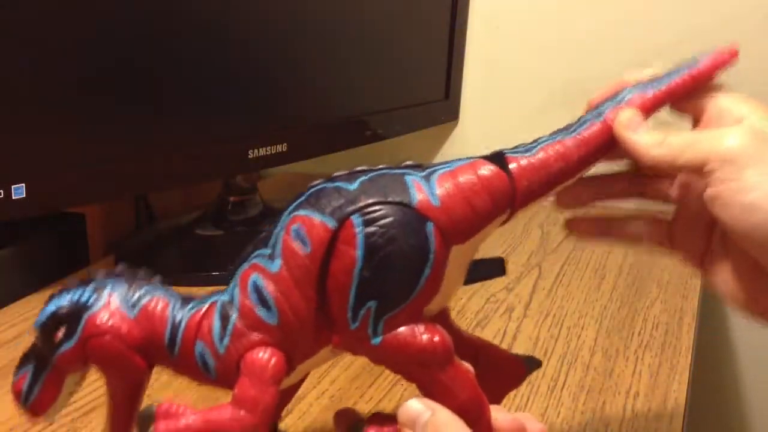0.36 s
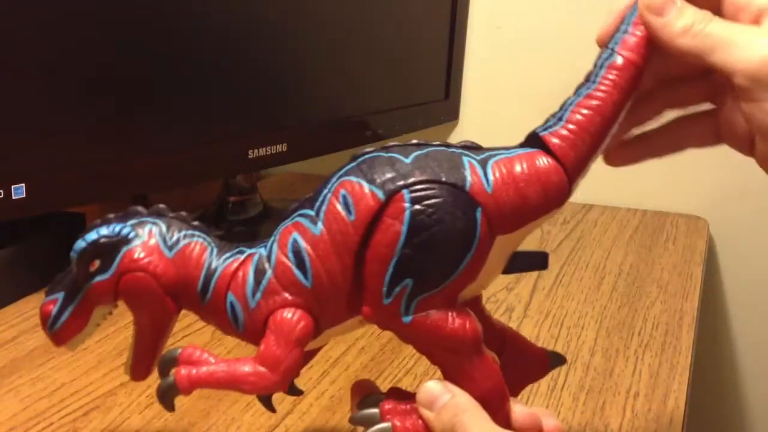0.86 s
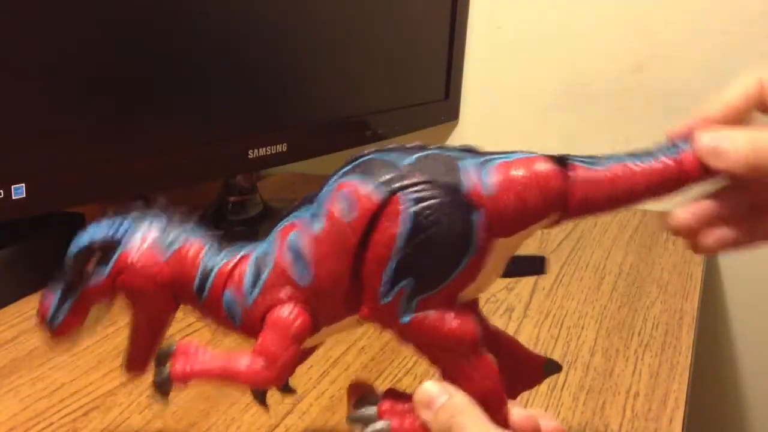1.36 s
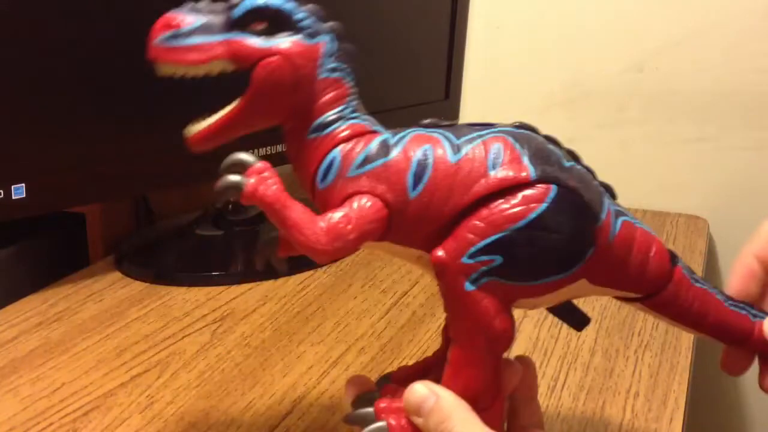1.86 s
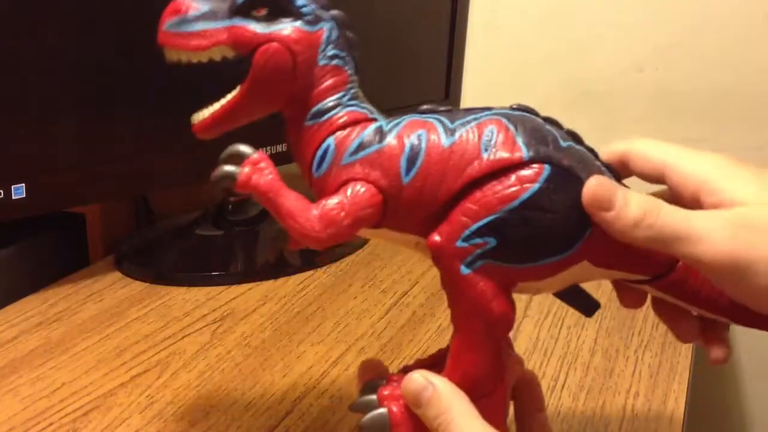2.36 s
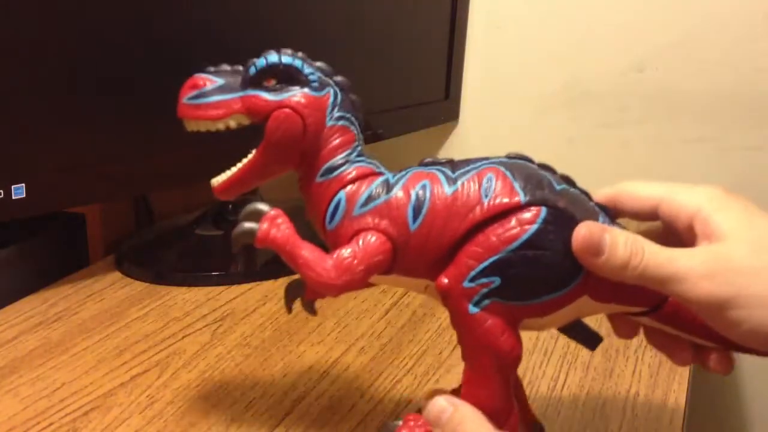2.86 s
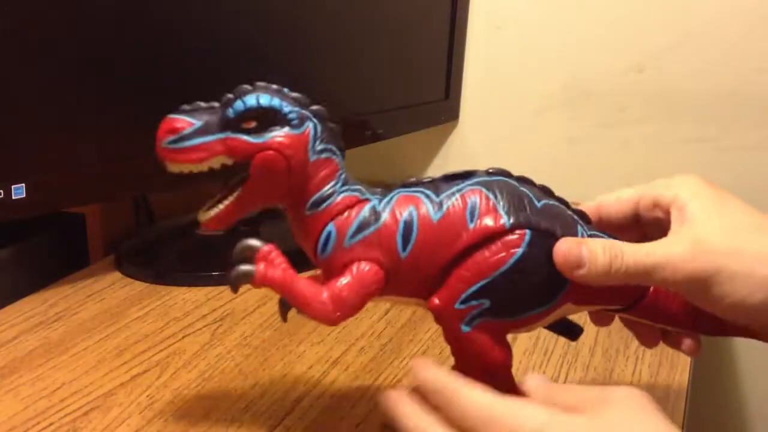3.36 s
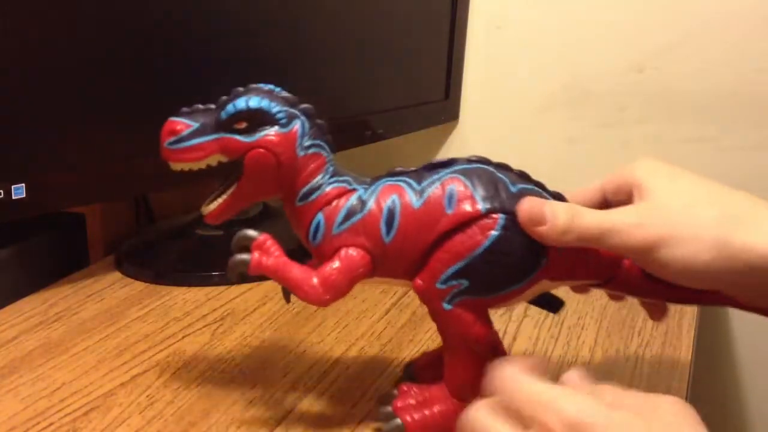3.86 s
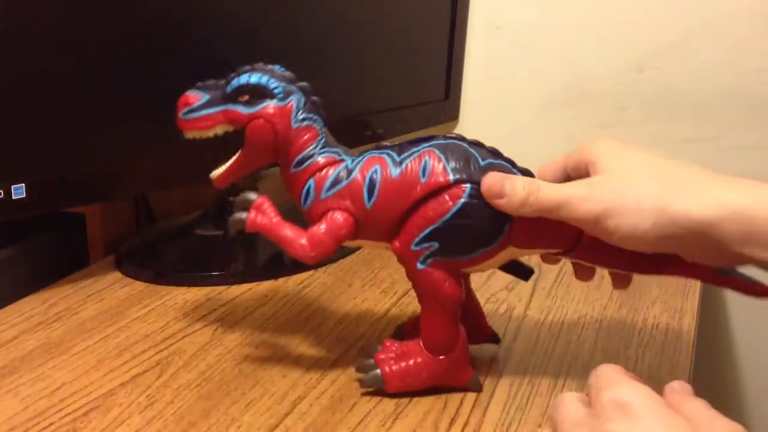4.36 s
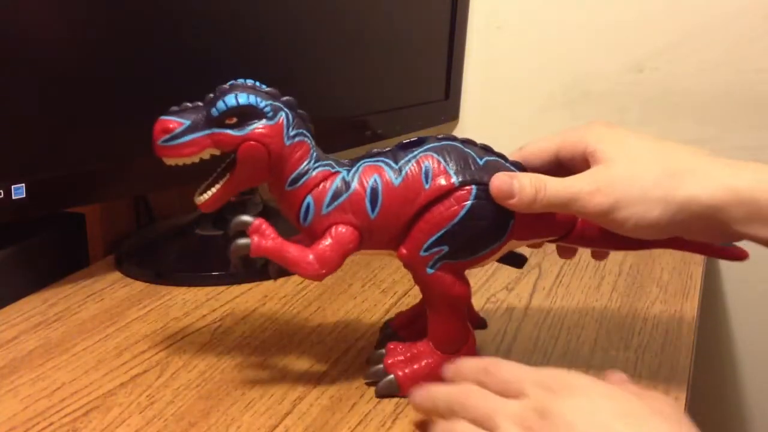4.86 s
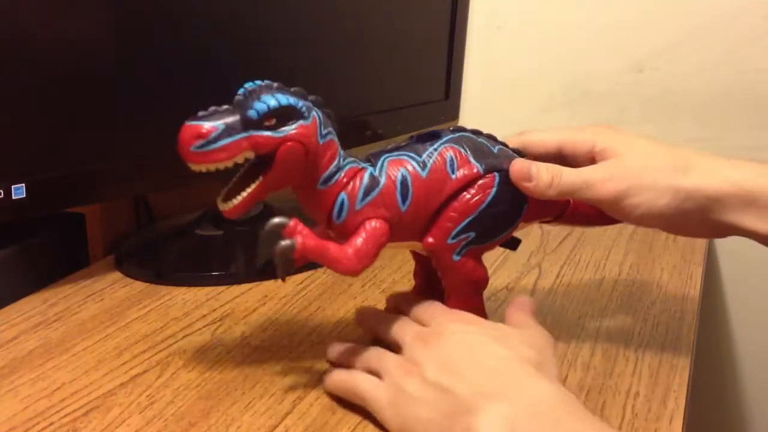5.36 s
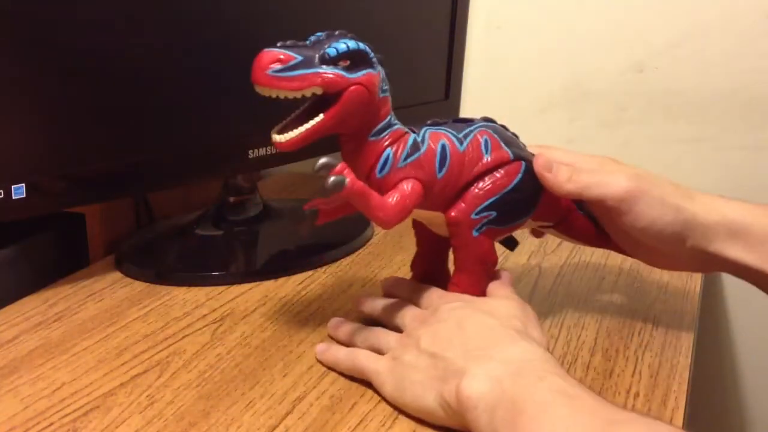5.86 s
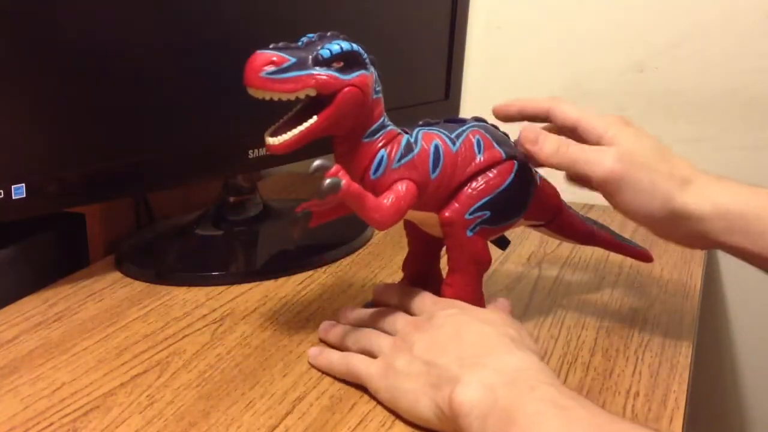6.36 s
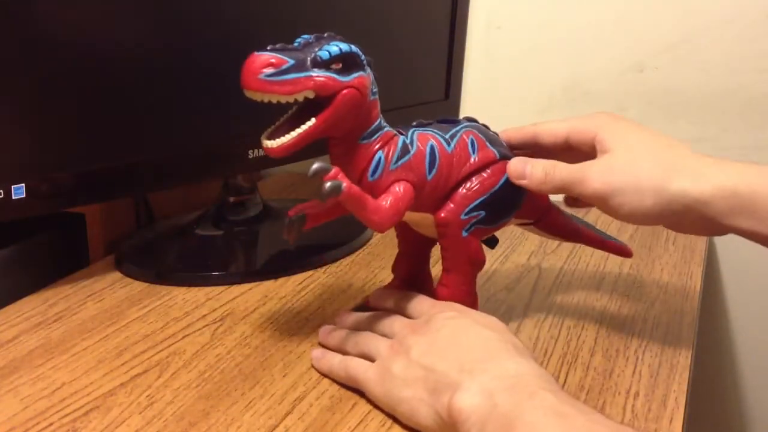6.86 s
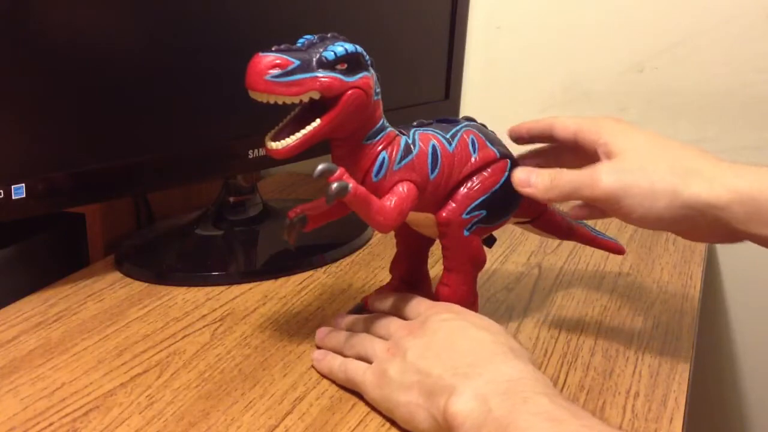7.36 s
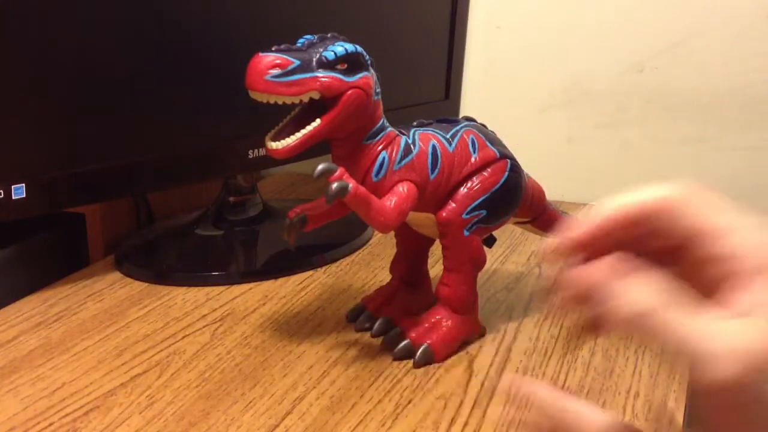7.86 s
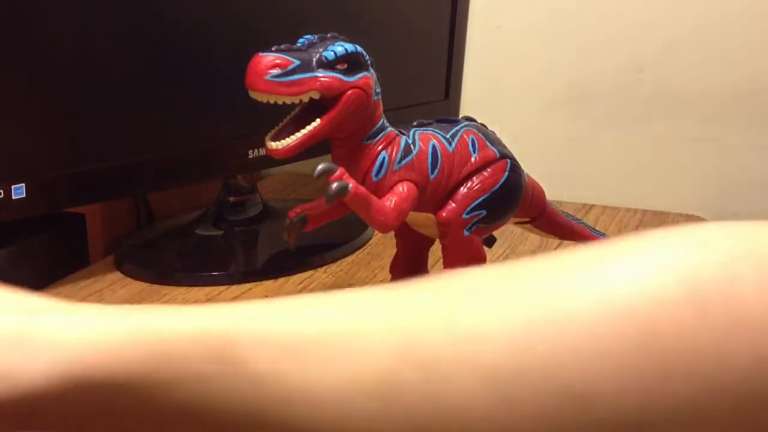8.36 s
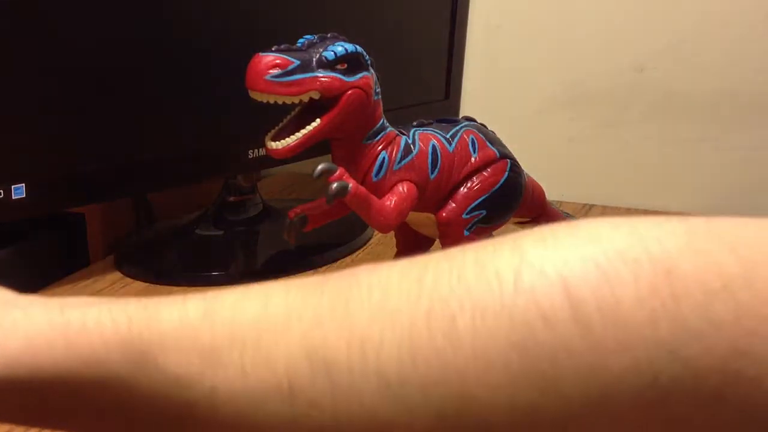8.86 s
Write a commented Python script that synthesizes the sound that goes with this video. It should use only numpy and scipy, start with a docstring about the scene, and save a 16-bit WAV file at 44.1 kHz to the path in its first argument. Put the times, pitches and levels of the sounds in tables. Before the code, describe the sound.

Sharp plastic clicks from a jointed hollow toy, then knocks, scrapes and hand rubbing on a wooden desk, close up in a quiet room.

```python
"""Clicks and a soft knock come first, over faint hiss: a hollow hard plastic toy is posed and slid about
on a wooden desk, close to a small microphone in a small quiet room. Noise bursts through resonances make
the clicks of its ratchet joints and feet and the knocks on the desk; swelling noise makes the brushing of
hands, the rubbing and the desk's hum. Gritty skids, one gliding squeak and a whispered rustle come later."""
import sys
import numpy as np
from scipy import signal
from scipy.fft import rfft, irfft, next_fast_len
from scipy.io import wavfile
from scipy.ndimage import uniform_filter1d

SR = 44100
rng = np.random.default_rng(int(sys.argv[2]) if len(sys.argv) > 2 else 0)


def generate_wav(sig):
    """Save sig (samples, or channels by samples) to the path in sys.argv[1] as 16-bit PCM at SR."""
    pcm = np.round(np.clip(np.atleast_2d(sig).T, -1, 1) * 32767).astype(np.int16)
    wavfile.write(sys.argv[1], SR, pcm)


def volts_from_db(level):
    """Convert decibel levels to linear amplitude ratios."""
    exponent = np.asarray(level, float) / 20
    return 10 ** exponent


N = 407484  # length in samples

# Place: steady room tone and hiss: f/Hz, relative density/dB per Hz
AIR_SPECTRUM = [(18, -48), (30, -20), (48, 5.5), (113, 3), (207, 3), (1190, -6), (1500, -6), (2400, -9),
                (4610, -8.5), (9820, -14.5), (14100, -12.5), (15300, -12)]
AIR_RMS_DB = -68.5
# Place: decay of the small room: f/Hz, t60/s
ROOM_DECAY = [(250, 0.41), (700, 0.2), (2000, 0.23), (5000, 0.21), (12000, 0.22)]

# Desk: feet and palms land: t/s, direct peak level ahead of the port/dB, contact/ms, rattle t60/s,
# share of the low modes/dB
KNOCKS = [(0.004, -43, 0.32, 0.09, 4), (1.32, -55.5, 0.96, 0.037, 4.5), (3.032, -37, 0.74, 0.086, -2),
          (3.336, -38, 0.9, 0.1, 1), (3.4, -41, 0.6, 0.091, 5), (4.084, -45, 0.76, 0.38, -14),
          (4.139, -46.5, 0.94, 0.48, -6), (4.276, -49, 0.54, 0.46, -2), (4.491, -37.5, 0.27, 0.21, 5),
          (4.801, -42, 0.65, 0.11, 2), (5.046, -41.5, 0.51, 0.24, -7), (5.299, -43.5, 0.78, 0.26, -4),
          (5.343, -18, 0.41, 0.14, -7.5), (5.57, -44.5, 0.49, 0.067, 4), (5.597, -32.5, 0.84, 0.087, 1.5),
          (5.755, -42.5, 0.38, 0.17, -7), (5.867, -53, 0.75, 0.38, -4), (5.91, -44.5, 0.85, 0.25, -1.5),
          (5.99, -51, 0.77, 0.19, -6), (6.082, -52, 1, 0.17, 6), (6.216, -50, 0.72, 0.21, 4),
          (6.677, -39, 1, 0.14, -3.5), (7.807, -58, 0.7, 0.12, -3), (7.848, -51, 0.7, 0.16, -3),
          (8.354, -36.5, 1, 0.25, -16)]
# Desk: modes of the wooden top: f/Hz, width/Hz, level/dB
DESK_MODES = [(129, 26, -8.5), (188.5, 27, -3.5), (248, 26, 1.5), (352.6, 67, 2.5), (531, 59, -1),
              (668, 65, -14.5), (965, 84, 0.5), (1208, 70, 0), (1378, 150, -2.5), (1714, 67, -3.5),
              (2143, 240, -4), (2700, 400, -9.5)]
# Desk: the top humming under the palm: f/Hz, width/Hz, level/dB
HUM_MODES = [(120, 27, -15.5), (193, 27.4, 0), (264, 45, -10), (352, 76.3, -12.5), (490, 153, -16)]
# Beside the microphone: the reaching arm bumps a thing; columns as in KNOCKS
BUMPS = [(8.656, -48, 0.22, 0.19, -1), (8.697, -42, 0.58, 0.2, -1), (8.713, -22.5, 0.51, 0.13, -7),
         (8.771, -42, 0.51, 0.17, -3), (8.843, -31, 0.99, 0.22, -8.5)]
# Beside the microphone: modes of that thing: f/Hz, width/Hz, level/dB (its rub passes them twice)
NEAR_MODES = [(248, 18, 4.5), (382, 38, 2), (604, 135, 3), (930, 190, 1), (1390, 350, 0), (1800, 380, -5.5),
              (2290, 170, 2), (2760, 370, -2.5), (3180, 220, -3), (4950, 840, -5), (5670, 760, -1.5)]
RATTLE_RISE_MS = 1.6

# Toy: joints slip, nails and claws tick: t/s, direct peak level ahead of the port/dB, brightest f/Hz,
# gain of the hollow body/dB, gain of the thin rims/dB
CLICKS = [(0.0044, -29.5, 2700, -22, -27), (0.129, -30.5, 6300, -30.5, -14), (0.2873, -43, 3520, -22, -29),
          (0.2932, -39.5, 3520, -23, -22), (0.2976, -35.5, 3820, -23.5, -28),
          (0.3057, -41.5, 4540, -18, -21), (0.4113, -39, 4540, -28, -21), (0.708, -50.5, 2260, -10, -32),
          (0.7332, -53, 2120, -9, -33), (0.739, -38, 2760, -18, -30), (0.8388, -29.5, 2530, -22, -20),
          (1.0184, -24, 2560, -24, -22), (1.071, -31.5, 2810, -23, -19), (1.0799, -15.5, 8000, -33, -5.5),
          (1.3213, -36.5, 2240, -12, -22), (1.3416, -38.5, 3220, -36, -22), (1.4402, -40, 5000, -25, -17),
          (1.48, -48, 2420, -25, -23), (1.4971, -30.5, 4530, -25.5, -18), (1.8724, -29, 4200, -23, -23),
          (1.9034, -29, 4500, -25, -19), (2.325, -40.5, 3340, -18.5, -23), (2.3694, -31.5, 4800, -28, -20),
          (2.3932, -28.5, 4260, -24.5, -25), (2.5687, -28.5, 5140, -27.5, -10.5),
          (2.6512, -51, 2620, -21, -31), (2.7267, -24, 4260, -34, -17), (2.778, -41, 6110, -19, -7),
          (2.797, -27, 3800, -26, -21), (3.0397, -37.5, 4300, -13.5, -20), (3.1185, -41, 6740, -22, -21),
          (3.1243, -33.5, 3600, -21, -20), (3.1284, -20, 5200, -31, -12), (3.1699, -34.5, 4620, -14, -9),
          (3.246, -31.5, 4500, -27, -32), (3.3383, -34.5, 4400, -12, -23), (3.4004, -28.5, 7200, -21, -14),
          (3.4184, -23.5, 4650, -26, -15), (3.5912, -24, 4600, -29, -17.5),
          (3.6531, -25.5, 4560, -24.5, -21), (3.7544, -30, 4330, -27, -25), (4.0934, -37.5, 6700, -24, -18),
          (4.2731, -19.5, 4540, -22.5, -13), (4.4888, -29, 7040, -18, -10),
          (4.4975, -24.5, 1500, -19.5, -34), (4.8045, -33.5, 6950, -23, -16),
          (5.3022, -32.5, 4900, -27, -15), (5.3403, -13.5, 4650, -12, -12), (5.46, -29, 3800, -20, -21),
          (5.463, -25.5, 4030, -22, -17), (5.5704, -36.5, 4700, -10.5, -15), (5.601, -35.5, 1560, -42, -20),
          (5.7182, -40, 4160, -27, -33), (5.7537, -40.5, 3980, -10, -24), (5.8663, -44.5, 1600, -16, -25),
          (5.909, -28, 4650, -20.5, -14.5), (5.99, -46, 4330, -6, -22), (6.235, -44, 1990, -10.5, -22),
          (6.445, -54, 1680, -19, -26), (6.4918, -43.5, 6600, -32, -19), (6.5388, -46.5, 6460, -26, -17),
          (6.664, -38, 4550, -17, -22), (6.7306, -53, 4240, -12, -20), (6.797, -44, 7100, -21, -31),
          (7.1763, -54, 1740, -11, -23), (7.3146, -52.5, 1650, -14, -8), (8.713, -35.5, 1500, -1, -9),
          (8.8412, -37, 1510, -18, -20), (8.937, -46, 2210, -29, -19)]
# Toy: resonances of the plastic shell: f/Hz, width/Hz, level/dB
SHELL_MODES = [(2000, 545, 4), (2480, 250, 4), (2930, 190, -0.5), (3600, 634, 0), (4004, 1250, -13.5),
               (4930, 1000, -5.5), (6147, 2520, 0.5), (6916, 2130, 0), (8980, 1400, -10.5),
               (10700, 410, -28)]
# Toy: air inside, passed twice: f/Hz, width/Hz, level each pass/dB
HOLLOW_MODES = [(917, 720, 9.5), (1500, 264, 9.1)]
# Toy: thin rims, passed twice: f/Hz, width/Hz, level each pass/dB
RIM_MODES = [(9950, 12000, 4.65)]
# How narrowly the struck spot favours its brightest pitch: f/width
SHARPNESS = 2.5
# All slips share one time scale; hollow clicks fill the room more, bright ones less
SLIP_MS, USUAL_HZ, USUAL_BODY_DB = 2.73, 4000, -22
CLICK_ROOM_DB, ROOM_DB_PER_OCTAVE, ROOM_DB_PER_BODY_DB = -1.5, -1.5, 0.0864

# Strokes, one a row: start t/s, rise/ms, fall/ms, rub level/dB, weight = hum over rub/dB
# The toy's feet drag on the wood
DRAGS = [(2.8, 293, 110, -62, -3), (3.1, 154, 100, -65, -3), (3.28, 117, 220, -64, 6),
         (3.59, 18, 130, -68.5, 5.5), (3.62, 170, 740, -65.5, 1), (3.95, 160, 240, -66.5, 1),
         (4.3, 116, 100, -73.5, 1), (4.5, 253, 98, -70, 0.5), (5.33, 28, 220, -66, -5),
         (5.44, 120, 170, -61.5, -3), (5.6, 66, 160, -62.5, -2), (5.74, 39, 52, -62.5, 2),
         (5.85, 175, 87, -68.5, 4.5), (6.07, 22, 49, -72, 8), (6.1, 430, 500, -77, 8),
         (6.89, 20, 33, -76, 2), (7.02, 25, 37, -74, 1), (7.05, 55, 340, -76.5, 7)]
# A flat hand or forearm sweeps over the desk; same columns
SWEEPS = [(4.79, 68, 170, -61.5, 12), (4.88, 94, 50, -63, 12), (4.98, 60, 90, -56.5, -1),
          (5.05, 100, 95, -64, -7), (5.14, 29, 45, -57, -2.5), (5.2, 32, 99, -55, -3.5),
          (5.26, 27, 45, -63, 1), (7.52, 152, 135, -63, -10), (7.7, 92, 50, -66, 4),
          (7.79, 26, 35.2, -56, 8), (7.83, 24, 45, -55, 10.5), (7.86, 44, 114.3, -57, -3),
          (7.97, 46, 95, -63.5, -5.5), (8.17, 65, 70, -64, -11), (8.26, 40, 60, -61, -16),
          (8.345, 9.7, 60, -65, 20.5), (8.31, 68, 111, -49.5, -13), (8.4, 62, 70.4, -64, -1),
          (8.46, 61, 120, -62.5, 0.5)]
# A cupped palm slides on the desk; same columns
WIPES = [(7.42, 6.2, 25, -55, -9.5), (7.42, 61, 101, -57, -4), (8.135, 41, 110, -57.5, -9.5),
         (8.2, 89, 40, -56, -10), (8.28, 60, 40, -51, -22)]
# The arm rubs along the thing beside the microphone; same columns
REACHES = [(8.58, 88, 40, -62, -3), (8.67, 30, 25, -56, 3), (8.7, 17, 80, -43.5, -4),
           (8.73, 45, 90, -54, -8), (8.8, 37, 75, -51.5, 3.5), (8.87, 75, 100, -64.5, 0),
           (9.11, 30, 40.2, -55.5, -2), (9.14, 86, 90, -42, -9)]
# Manner of each kind of stroke: dry brushing level at the usual rub/dB, its growth/dB per rub dB,
# its loss/dB per weight dB, swell exponent (higher is more pointed)
DRAG_MANNER = (-70, 0, 2.7, 1.23)
# Manner of the sweeps; same columns
SWEEP_MANNER = (-61, 1.09, 0.62, 1.18)
# Manner of the wipes; same columns
WIPE_MANNER = (-67.5, 1.54, 0.11, 1.36)
# Manner of the reaches; same columns
REACH_MANNER = (-65.5, 0.41, 0.69, 1.72)
USUAL_RUB_DB = -60
# Dry brushing of skin: f/Hz, relative density/dB per Hz
BRUSH_SPECTRUM = [(300, -21), (1000, -0.5), (3000, -10), (7000, 2), (10000, -2.5), (13000, -2),
                  (15000, -10)]
# Rub of the toy's feet, passed twice: f/Hz, width/Hz, level each pass/dB
FEET_MODES = [(700, 390, 4), (963, 160, 6), (1226, 130, 3.5), (1700, 720, 1), (2460, 2200, -4),
              (3960, 2400, -4.5)]
# Loose contact of flat skin, passed twice: f/Hz, width/Hz, level each pass/dB
FLAT_MODES = [(420, 350, 5), (1036, 510, 2.5), (1710, 660, 2.5), (2960, 1440, 0.5), (4420, 750, -1.5)]
# Hollow under the hand, passed twice: f/Hz, width/Hz, level each pass/dB
GRIP_MODES = [(915, 260, -3.5), (1260, 270, -1.5), (1615, 310, 1), (2530, 570, -5), (3147, 260, 1.5),
              (3810, 400, -3.5), (4240, 230, -2.5)]

# A palm grips, lets go and skids: t/s, direct peak of the rub ahead of the port/dB,
# fall to 1/e/ms, hiss level re that peak/dB
SKIDS = [(4.8165, -45.5, 19, -6), (4.8473, -42, 28, -8), (4.9286, -51, 28, 1.5), (5.1091, -39.5, 24, -11),
         (5.1536, -40, 19, -13), (5.2244, -39.5, 14, -15), (6.0172, -53.5, 35, -8.5),
         (7.4229, -44.5, 46, -10), (7.4599, -49.5, 45, -4.5), (7.8045, -53, 65, -8.5),
         (8.1445, -51.5, 62, -27), (8.2016, -45, 14, -16), (8.2261, -47.5, 31, -9.5)]
# Skin squeaks once: t/s, f/Hz, level/dB
SQUEAK = [(5.0, 2000, -77), (5.02, 2270, -73), (5.037, 2490, -56), (5.05, 2140, -62), (5.065, 1900, -80)]
# A fingertip whispers over the ridges: t/s, level/dB
RUSTLE = [(6.5, -94), (6.56, -78), (6.63, -76), (6.68, -93)]

# Microphone port, a peak then a notch: f/Hz, width/Hz
PORT = [(4780, 450), (5060, 280)]
# Overall band limits, weak lows and a steep fall near 15.4 kHz: f/Hz, level/dB
BAND_LIMITS = [(40, -22), (70, -19), (110, -1.5), (15250, 0), (15500, -62)]


def evened(x):
    """Scales to rms 1."""
    return x / np.sqrt(np.mean(x ** 2) + 1e-20)


def read(points, hz):
    """Reads a spectrum on a log-frequency axis."""
    f, value = np.transpose(points)
    return np.interp(np.log(hz + 1), np.log(f + 1), value)


def add(mix, s, sound):
    """Mixes a sound in at time s."""
    part = mix[max(round(s * SR), 0):][:len(sound)]
    part += sound[:len(part)]


def peaks(modes, hz):
    """Damped resonances: powers add, with the shortest causal (minimum) phase."""
    each = np.array([volts_from_db(db) * hz * w / abs(f ** 2 - hz ** 2 + 1j * hz * w) for f, w, db in modes])
    cepstrum = irfft(np.log(np.linalg.norm(each, axis=0) + 1e-4))
    # folding the cepstrum forward in time makes the phase minimal
    cepstrum[1:len(hz) - 1] *= 2
    cepstrum[len(hz):] = 0
    return np.exp(rfft(cepstrum))


def coloured(x, gain):
    """Filters x by gain(hz)."""
    size = 2 * next_fast_len(len(x) // 2 + 1)
    hz = np.fft.rfftfreq(size, 1 / SR)
    return irfft(rfft(x, size) * gain(hz), size)[:len(x)]


def room(x):
    """Six random sparse tails, each band dying at its own speed, crossfaded so no one draw colours all."""
    t, out = np.arange(N) / SR, np.zeros(N)
    for k in range(6):
        taps = np.zeros(SR // 2)
        at = np.arange(100, SR // 2 - 10, 10)
        taps[at + rng.integers(0, 10, len(at))] = rng.choice([-1., 1.], len(at))
        hz, lag, z = signal.stft(taps, SR, nperseg=256)
        decay = volts_from_db(-60 * lag / read(ROOM_DECAY, hz)[:, None])
        tail = signal.istft(z * decay, SR, nperseg=256)[1]
        # steady crossfade: seven steps a second round the six tails
        turn = np.cos(np.pi / 2 * np.clip((7 * t - k) % 6 - 1, -1, 1))
        out += signal.oaconvolve(x * turn, tail / np.linalg.norm(tail))[:N]
    return out


def air():
    """Steady room tone and microphone hiss: noise with a fixed spectrum."""
    hiss = coloured(rng.standard_normal(N), lambda f: volts_from_db(read(AIR_SPECTRUM, f)))
    return volts_from_db(AIR_RMS_DB) * evened(hiss)


def knocks(rows, modes):
    """A blow and a rough rattle after it, duller when the contact is longer, shake a damped body."""
    out, t = np.zeros(N), np.arange(SR // 3) / SR
    rattle = rng.standard_normal((len(rows), len(t)))
    for (s, peak_db, contact_ms, t60, low_db), grit in zip(rows, rattle):
        push = grit * (1 - np.exp(-1000 * t / RATTLE_RISE_MS)) * volts_from_db(-60 * t / t60)
        push += volts_from_db(21) * (t == 0)  # the blow itself

        def body(f):
            low = volts_from_db(low_db / (1 + (f / 800) ** 6))
            return low * peaks(modes, f) / (1 + 1j * f * contact_ms / 1000) ** 2

        thud = coloured(push, body)
        add(out, s, volts_from_db(peak_db) * thud / abs(thud).max())
    return out + volts_from_db(-6) * room(out)


def clicks():
    """A short chatter of slips rings the shell; each spot on the toy has its own colour."""
    near, far, t = np.zeros(N), np.zeros(N), np.arange(2048) / SR
    chatter = rng.standard_normal((len(CLICKS), len(t)))
    u = 1000 * t / SLIP_MS
    slip_level = np.minimum(u * 8, 1) * np.exp(-u ** 2) + 0.22 * np.exp(-u / 4) + 1.43 * np.exp(-u * 12)
    for (s, peak_db, hz, body_db, rim_db), grit in zip(CLICKS, chatter):
        bright_db = ROOM_DB_PER_OCTAVE * np.log2(hz / USUAL_HZ)
        room_db = CLICK_ROOM_DB + bright_db + ROOM_DB_PER_BODY_DB * (body_db - USUAL_BODY_DB)
        slips = grit * slip_level

        def spot(f):
            struck = 0.53 + peaks([(hz, hz / SHARPNESS, 0)], f)
            shell = struck * peaks(SHELL_MODES, f) * f ** 2 / (f ** 2 + 1500 ** 2)
            hollow = volts_from_db(body_db) * peaks(HOLLOW_MODES, f) ** 2
            return shell + hollow + volts_from_db(rim_db) * peaks(RIM_MODES, f) ** 2

        tick = coloured(slips, spot)
        scale = volts_from_db(peak_db) / abs(tick).max()
        add(near, s, scale * tick)
        # the walls hear every side of the toy, so the notches of one direction even out
        smooth_tick = np.linalg.norm(slips) * coloured(1. * (t == 0), spot)
        add(far, s, scale * volts_from_db(room_db) * smooth_tick)
    return near + room(far)


def strokes(rows, manner, rub_colour, hum_modes):
    """A surface catching on the grain, as noise in three layers: dry hiss, ringing rub and low hum."""
    levels, (brush_db, per_rub, per_weight, swell) = np.zeros((3, N)), manner
    for start, rise_ms, fall_ms, rub_db, weight_db in rows:
        ms = np.arange(0, rise_ms + fall_ms, 1000 / SR)
        speed = np.interp(ms, [0, rise_ms, rise_ms + fall_ms], [0, 1, 0]) ** swell
        # brushing grows with the rub and is smothered by weight
        dry_db = brush_db + per_rub * (rub_db - USUAL_RUB_DB) - per_weight * weight_db
        for level, db in zip(levels, (dry_db, rub_db, rub_db + weight_db)):
            add(level, start, volts_from_db(db) * speed)
    brush, rub, hum = uniform_filter1d(levels, size=200)
    a, b, c, d = rng.standard_normal((4, N))
    judder = volts_from_db(1.4 * evened(uniform_filter1d(d, size=300)))  # stick and slip
    hiss = evened(coloured(a * judder ** 0.53, lambda f: volts_from_db(read(BRUSH_SPECTRUM, f))))
    ringing = evened(coloured(b * judder, rub_colour))
    humming = evened(coloured(c * judder, lambda f: peaks(hum_modes, f)))
    return brush * hiss + rub * ringing + hum * humming


def skids():
    """Abrupt gritty bursts of noise in the hollow under the hand."""
    out, t = np.zeros(N), np.arange(SR // 4) / SR
    noise = rng.standard_normal((len(SKIDS), 2, len(t)))
    for (s, peak_db, skid_ms, hiss_db), (a, b) in zip(SKIDS, noise):
        fade = np.minimum(t / 0.00035, 1) * np.exp(-1000 * t / skid_ms)
        rub = coloured(a * fade, lambda f: peaks(GRIP_MODES, f) ** 2)
        hiss = coloured(b * fade, lambda f: volts_from_db(read(BRUSH_SPECTRUM, f)))
        burst = rub / abs(rub).max() + volts_from_db(hiss_db) * hiss / hiss[:600].std()
        add(out, s, volts_from_db(peak_db) * burst)
    return out + volts_from_db(-4) * room(out)


def squeak():
    """A gliding stick-slip tone: a sine with a shaky level."""
    s, hz, db = np.transpose(SQUEAK)
    t, out = np.arange(s[0], s[-1], 1 / SR), np.zeros(N)
    shake = 1 + 0.4 * evened(uniform_filter1d(rng.standard_normal(len(t)), size=150))
    tone = np.sin(2 * np.pi * np.cumsum(np.interp(t, s, hz)) / SR)
    add(out, s[0], shake * volts_from_db(np.interp(t, s, db)) * tone)
    return out


def rustle():
    """A faint narrow hiss: noise through one resonance, passed twice."""
    s, db = np.transpose(RUSTLE)
    hiss = evened(coloured(rng.standard_normal(N), lambda f: peaks([(4650, 550, 0)], f) ** 2))
    return hiss * volts_from_db(np.interp(np.arange(N) / SR, s, db, left=-150, right=-150))


def port(hz):
    """The microphone port: a resonance over an anti-resonance, flat far from both."""
    peak, notch = (f ** 2 - hz ** 2 + 1j * hz * w for f, w in PORT)
    return notch / peak


def scene():
    """Everything on the desk passes the microphone port; the room tone and hiss are added behind it."""
    hiss = air()
    hits = knocks(KNOCKS, DESK_MODES) + clicks() + knocks(BUMPS, NEAR_MODES)
    rubs = (strokes(DRAGS, DRAG_MANNER, lambda f: peaks(FEET_MODES, f) ** 2, DESK_MODES[:5])
            + strokes(SWEEPS, SWEEP_MANNER, lambda f: peaks(FLAT_MODES, f) ** 2, HUM_MODES)
            + strokes(WIPES, WIPE_MANNER, lambda f: peaks(GRIP_MODES, f) ** 2, HUM_MODES)
            + strokes(REACHES, REACH_MANNER, lambda f: peaks(NEAR_MODES[2:], f) ** 2, NEAR_MODES[:2]))
    desk = coloured(hits + rubs + skids() + squeak() + rustle(), port)
    return (desk + hiss)[None]


def roll_off(x):
    """The treble ends steeply here."""
    return signal.sosfilt(signal.butter(12, 16540, fs=SR, output="sos"), x)


def record(dry):
    """Applies the overall band limits: weak lows and a steep fall near 15.4 kHz."""
    finished = coloured(dry[0], lambda f: volts_from_db(read(BAND_LIMITS, f)))
    return roll_off(finished[None])


dry = scene()
out = record(dry)
generate_wav(out)
```